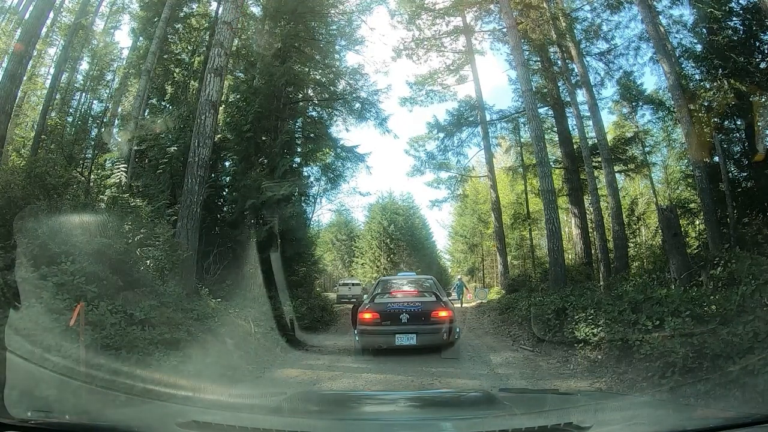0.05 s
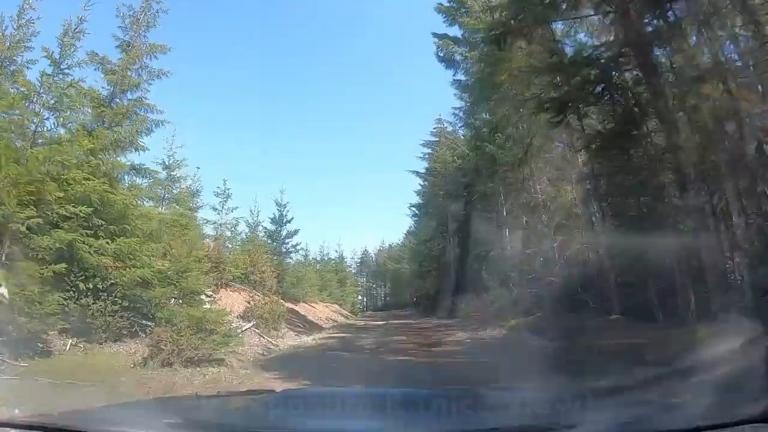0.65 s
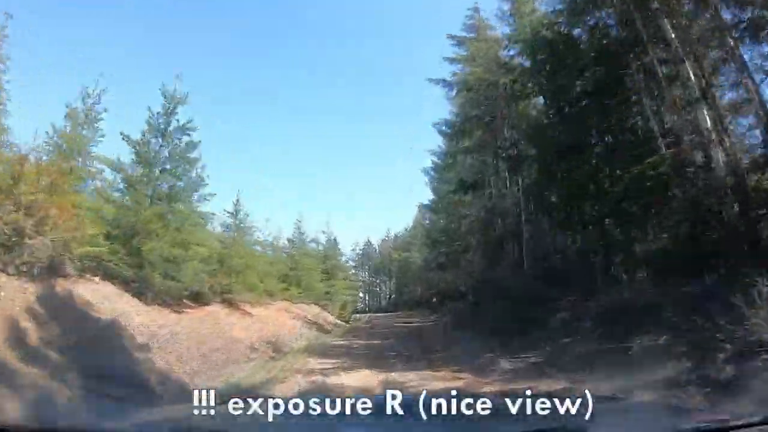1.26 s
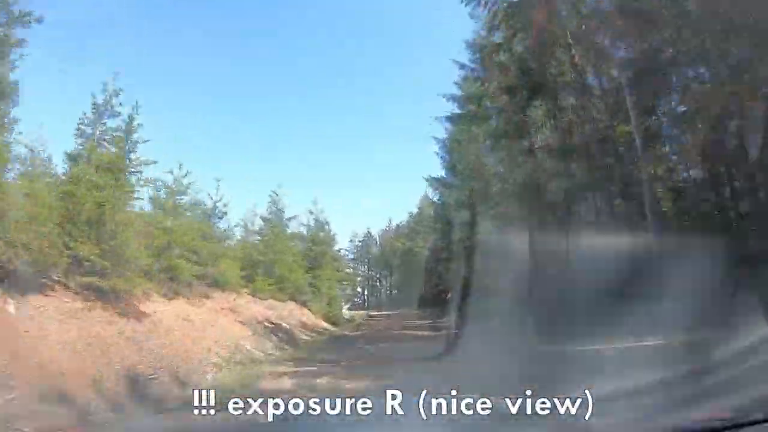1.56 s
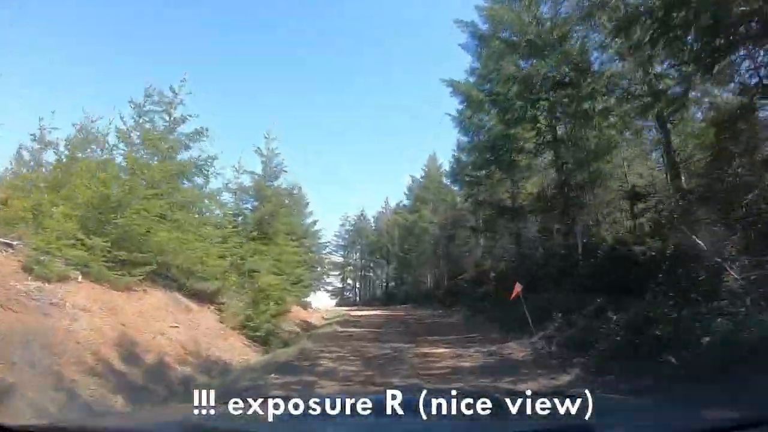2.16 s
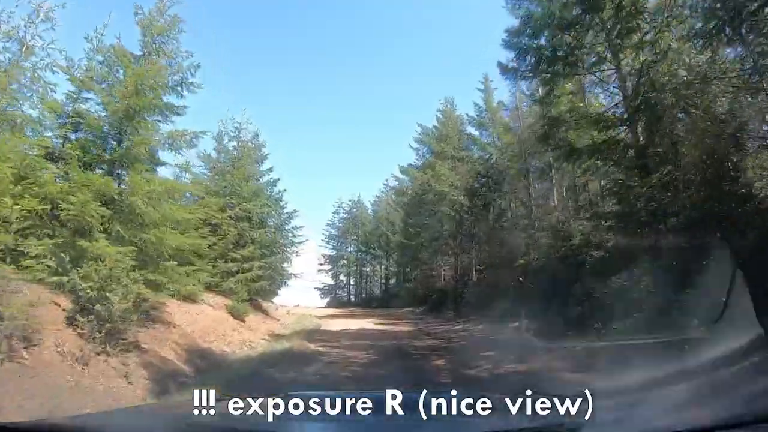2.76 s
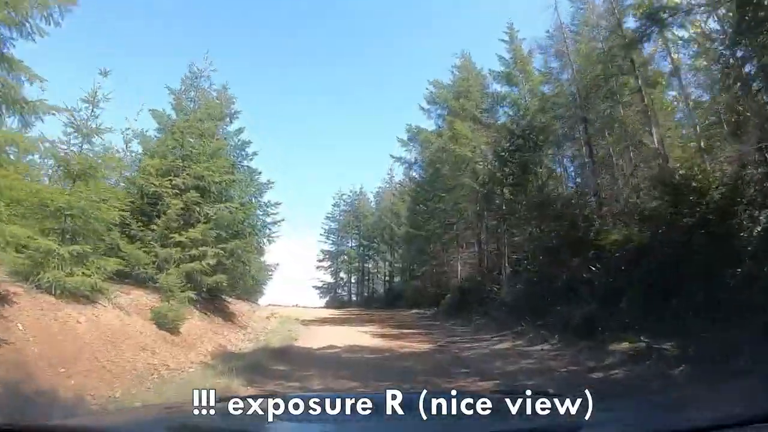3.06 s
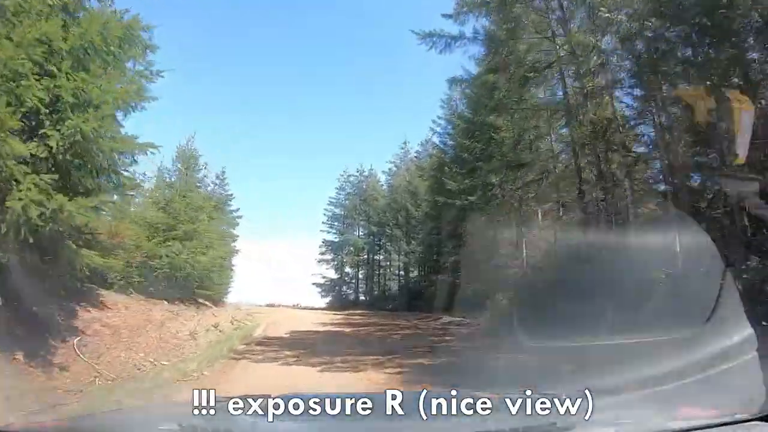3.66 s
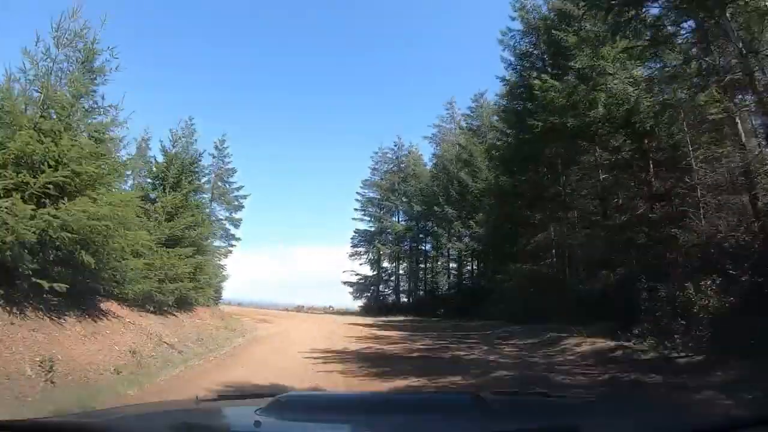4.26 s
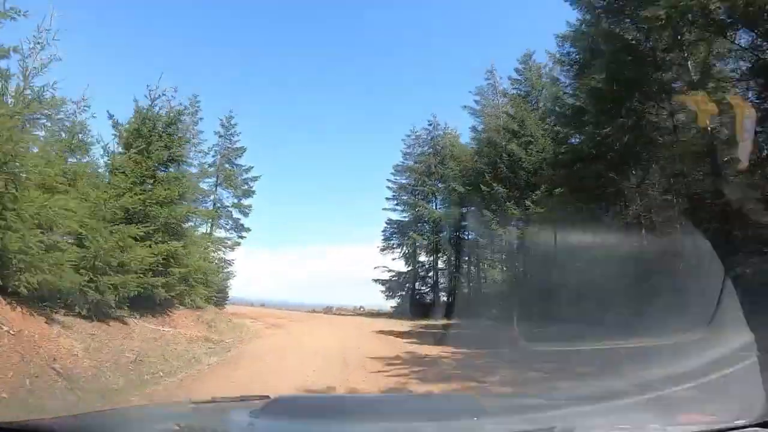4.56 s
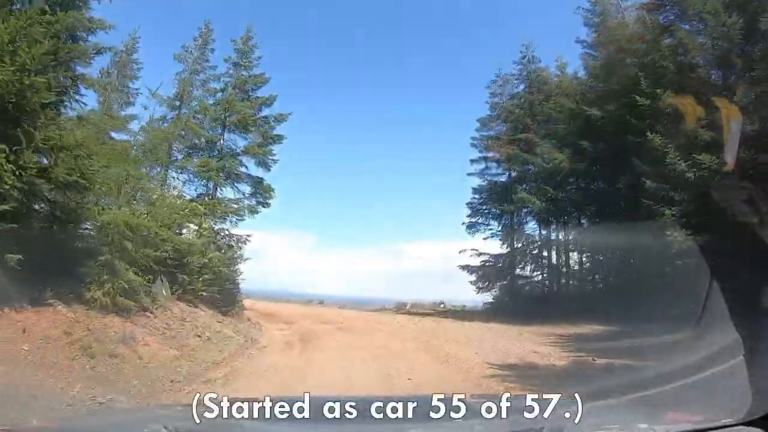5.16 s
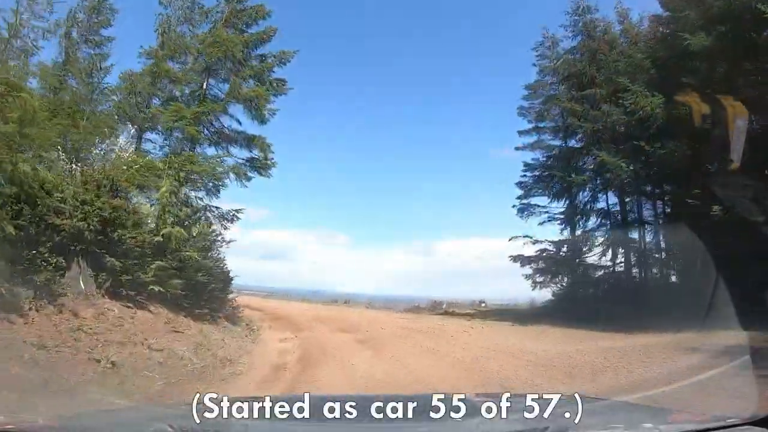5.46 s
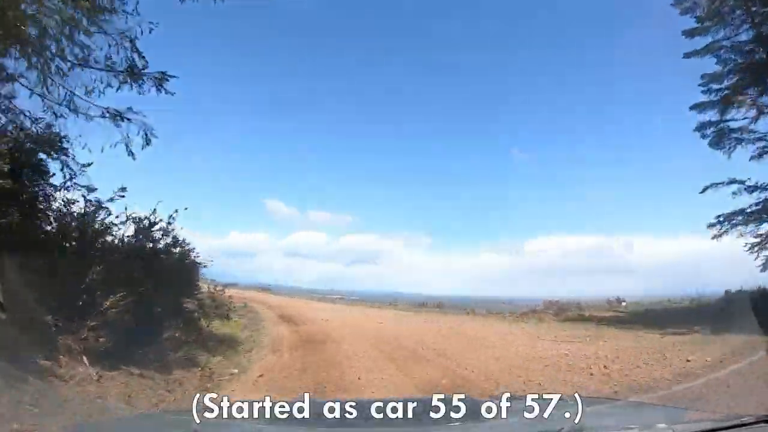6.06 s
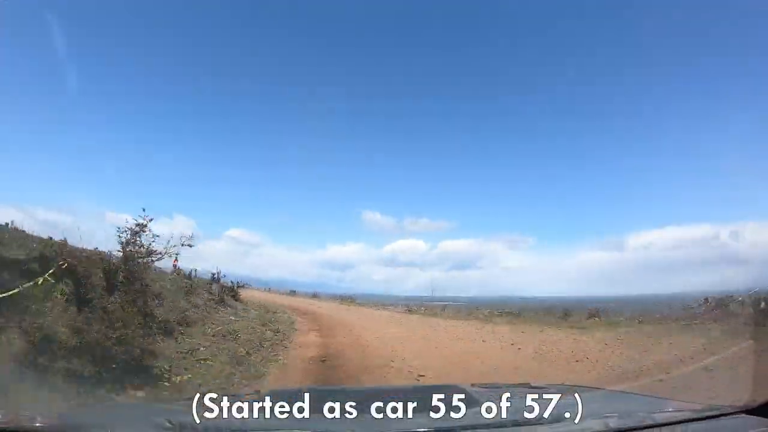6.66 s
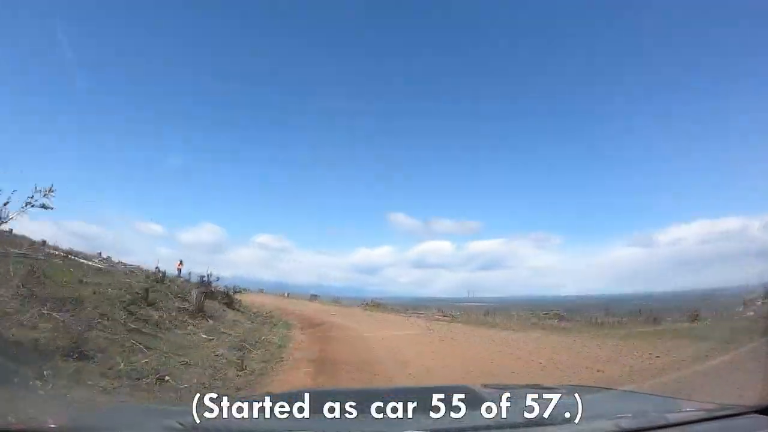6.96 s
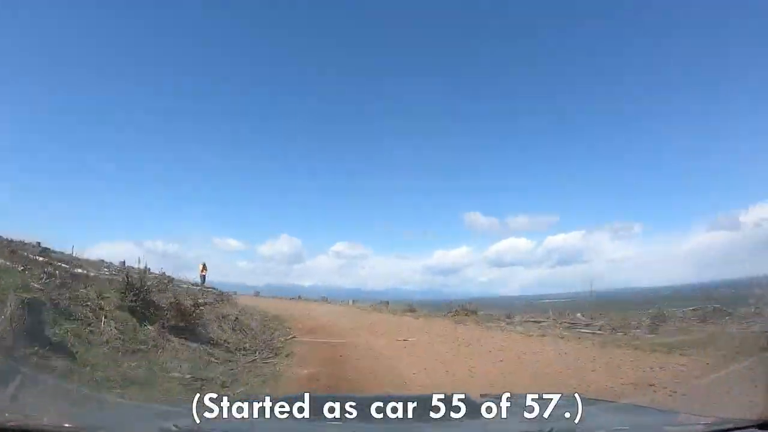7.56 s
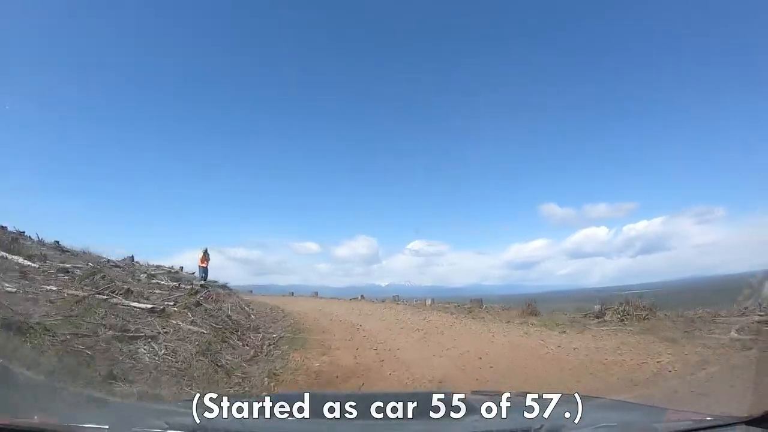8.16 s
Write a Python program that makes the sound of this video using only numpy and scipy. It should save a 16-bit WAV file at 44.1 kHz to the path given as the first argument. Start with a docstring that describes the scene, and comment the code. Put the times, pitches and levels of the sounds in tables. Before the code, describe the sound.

A lumpy four-cylinder idle is heard briefly inside a standing rally car. With a small tick it cuts to the car running hard on a gravel road. The engine booms and rasps, easing off and then pulling again, while the tyres rumble and something loose knocks over the ruts. Gravel and stones strike the floor and wheel arches, most thickly in the last few seconds. The microphone is close, in the bare cabin.

```python
"""A lumpy four-cylinder idle, heard from inside a rally car waiting in a queue. Then all at once
the car is running hard along a gravel forest road. At a close stereo microphone in the bare cabin
the engine booms and rasps on the throttle while the tyres rumble below. They fling gravel and
stones against the floor pan and wheel arches, most thickly in a long bend."""
import sys
import numpy as np
from scipy import signal
from scipy.fft import rfft, irfft
from scipy.io import wavfile
from scipy.ndimage import uniform_filter1d

SR = 44100
rng = np.random.default_rng(int(sys.argv[2]) if len(sys.argv) > 2 else 0)


def pcm_store(signal):
    """Save signal as 16-bit PCM."""
    levels = np.round(np.clip(np.atleast_2d(signal), -1, 1) * 32767)
    wavfile.write(sys.argv[1], SR, levels.astype(np.int16).T)


N = 366471
TIME = np.arange(N) / SR


def from_db(db):
    return 10 ** (np.asarray(db) / 20)


def rms_one(x):
    return x / np.sqrt(np.mean(x ** 2) + 1e-20)


def curve(rows):
    """A curve of time_s, value at every sample."""
    return np.interp(TIME, *np.transpose(rows))


def add(out, start_s, sound):
    """Mix a sound in at a given time."""
    i = int(np.clip(start_s * SR, 0, N - 1))
    out[:, i:i + sound.shape[1]] += sound[:, :N - i]


def colour(x, spectrum):
    """Shape a sound by rows of freq_hz, level_db, falling 24 dB an octave past their ends."""
    hz, db = np.transpose(spectrum)
    octave = np.log2(np.fft.rfftfreq(x.shape[-1], 1 / SR) + 1)
    outside = np.maximum(np.log2(hz[0]) - octave, 0) + np.maximum(octave - np.log2(hz[-1]), 0)
    gain_db = np.interp(octave, np.log2(hz), db) - 24 * outside
    return irfft(rfft(x) * from_db(gain_db), x.shape[-1])


# Stereo width, side against mid: freq_hz, side_db
STEREO_WIDTH = [(40, -58.5), (120, -71.5), (500, -69.5), (2000, -30.5), (4500, -19), (9000, -15),
                (13000, 0)]
def noise(spectrum):
    """Stereo noise, centred in the bass and middle, wider in the treble."""
    mid, side = colour(rng.standard_normal((2, N)), spectrum)
    side = colour(side, STEREO_WIDTH)
    return rms_one(np.array([mid + side, mid - side]))


def drift(rate_hz):
    """A smooth random wander of spread 1."""
    step, settle = 40, 2000
    pole = np.exp(-2 * np.pi * rate_hz * step / SR)
    white = rng.standard_normal(N // step + settle + 2)
    slow = signal.lfilter([1], [1, -2 * pole, pole ** 2], white)[settle:]
    return np.interp(np.arange(N) / step, np.arange(len(slow)), rms_one(slow))


def resonate(x, hz, width_hz):
    """A resonance with gain 1 at its peak."""
    r = np.exp(-np.pi * width_hz / SR)
    feedback = [1, -2 * r * np.cos(2 * np.pi * hz / SR), r * r]
    return signal.lfilter(np.array([1, 0, -1]) * (1 - r * r) / 2, feedback, x)


def with_modes(x, modes):
    """A sound with some resonances standing out of it."""
    return rms_one(x + sum(from_db(db) * resonate(x, hz, width) for hz, width, db in modes))


def snippet(ringing):
    """A random third of a second of a dense ringing."""
    start = rng.integers(N - SR // 3)
    return ringing[:, start:start + SR // 3]


def blow(ringing, rise_s, t60_s, tail_db, tail_t60_s):
    """One blow: a quick rise, a fast decay and the cabin's weaker tail."""
    t = TIME[:ringing.shape[1]]
    decay = from_db(-60 * t / t60_s) + from_db(tail_db - 60 * t / tail_t60_s)
    return rms_one(ringing) * (1 - np.exp(-t / rise_s)) * decay


def patter(per_s, size_db, t60_s):
    """The loudness contour of random grains of all sizes, each dying away."""
    sizes = from_db(size_db * np.minimum(rng.exponential(1, N), 3.5))
    grains = (rng.random(N) < per_s / SR) * sizes ** 2
    energy = signal.lfilter([1], [1, -from_db(-120 / (t60_s * SR))], grains + 1e-12)
    return rms_one(uniform_filter1d(np.sqrt(energy), size=60))


# The road, rutted at first, smooth on the straight, rough in the bend: time_s, roughness_db
ROAD_ROUGHNESS = [(.69, -1), (.98, 1), (1.12, 2.5), (1.7, 2), (2.05, -2.5), (2.5, -1.5), (3.1, -1.5),
                  (4.5, -1.5), (5.45, -0.5), (5.8, 0), (6.45, 4.5), (6.78, -1), (7.55, 3.5), (7.78, 4),
                  (8.1, 5.5)]
# The body shell shaking around the microphone: freq_hz, level_db
SHAKE_SPECTRUM = [(15, -10.5), (28, -3), (42, 2.5), (52, -3.5), (62, 4), (80, -7.5), (120, -3), (170, -9),
                  (260, -41.5)]
# The tyres, heard through the floor: freq_hz, level_db
ROAR_SPECTRUM = [(80, 1), (130, 2.5), (160, 6.5), (185, -3.5), (215, 1.5), (250, -1), (400, -6),
                 (550, -9.5), (700, -17), (950, -24), (1300, -34.5), (2200, -43.5), (4000, -58),
                 (8000, -67.5)]
# Resonances of the bare cabin: freq_hz, width_hz, boost_db
CABIN_MODES = [(100.7, 19, -7.5), (206.6, 4.9, 6.5), (285, 6, 0.5), (344, 23.6, 1.5), (415.3, 9.5, 1.5),
               (520, 39, -21.5), (955, 77, -1.5)]
def road(rough_db):
    """Ruts shake the body shell; the tread roars over the gravel and rings the cabin."""
    shake = from_db(-18 + .81 * rough_db + .26 * drift(16)) * noise(SHAKE_SPECTRUM)
    roar = from_db(-20 + rough_db + drift(16)) * with_modes(noise(ROAR_SPECTRUM), CABIN_MODES)
    return shake + roar


# The floor pan under gravel: freq_hz, level_db
PAN_SPECTRUM = [(300, 14.5), (700, 14), (1300, 6), (2100, 5), (2900, -0.5), (4200, -3.5), (5200, -10.5),
                (6300, -18.5), (8000, -24.5)]
# Its resonances: freq_hz, width_hz, boost_db
PAN_MODES = [(916, 64, -3.5), (1537, 15, -13.5), (2160, 90, -14), (3370, 60, -6), (4220, 80, -8),
             (4630, 72, -4.5), (5100, 61, -7)]
# Sharp grit in the wheel arches: freq_hz, level_db
GRIT_SPECTRUM = [(3000, -7.5), (5000, 16), (6700, 2), (8000, 6.5), (10500, 0), (13000, 1), (15500, -20)]
# Resonances of the thin arch liners: freq_hz, width_hz, boost_db
ARCH_MODES = [(4500, 150, -1), (5140, 71, -1.5), (7960, 130, -4.5), (8800, 110, -7), (10200, 78, -1)]
def underbody():
    """The steady ringing of the floor pan, and of the arch liners under grit."""
    return with_modes(noise(PAN_SPECTRUM), PAN_MODES), with_modes(noise(GRIT_SPECTRUM), ARCH_MODES)


# Gravel thrown up by the tyres: time_s, level_db
SPRAY_LEVEL = [(.69, -39.5), (1.0, -41), (1.15, -53), (1.45, -42.5), (2.25, -42.5), (2.42, -53.5),
               (3.15, -52.5), (3.6, -62.5), (4.25, -44.5), (5.25, -39), (5.48, -41), (5.85, -34.5),
               (6.3, -31), (6.52, -31.5), (6.75, -33.5), (7.1, -38), (7.35, -28.5), (7.6, -35.5),
               (8.06, -31.5), (8.31, -36.5)]
def spray(spray_db, ringing, grit):
    """Gravel peppers the arches: pebbles clatter, chips tick, and a few lumps clunk dully."""
    pebbles = patter(per_s=79, size_db=-3.5, t60_s=.2) * (from_db(-6) * ringing + from_db(-21.5) * grit)
    chips = from_db(-29) * patter(per_s=33, size_db=9.5, t60_s=.04) * grit
    clunks = from_db(4) * patter(per_s=32, size_db=2, t60_s=.45)
    lumps = clunks * noise([(450, 1.5), (700, 2), (1200, -6.5), (2000, -13)])
    return from_db(spray_db) * (pebbles + chips + lumps)


# Sheets of gravel in the bend: start_s, length_s, level_db
GRAVEL_SHEETS = [(5.991, 0.048, -28), (6.112, 0.11, -32), (6.28, 0.096, -28.5), (6.711, 0.093, -33),
                 (7.347, .08, -34.5)]
# Their small stones ring the pan's upper modes: freq_hz, gain_db
SHEET_COLOUR = [(500, 4), (1300, -2), (4500, 3.5), (9000, 0)]
def showers(ringing, grit, rise_s=.01, fall_s=.017):
    """A tyre digs in and throws a whole sheet of gravel: a dense rattle that holds and dies away."""
    swell = 0
    for start_s, length_s, level_db in GRAVEL_SHEETS:
        rise = np.clip((TIME - start_s) / rise_s, 0, 1)
        fall = np.exp(-np.maximum(TIME - start_s - length_s, 0) / fall_s)
        swell += from_db(level_db) * rise * fall
    grains = patter(per_s=900, size_db=2.5, t60_s=.04)
    return swell * grains * (colour(ringing, SHEET_COLOUR) + from_db(-20) * grit)


# A loose part knocking in the car: start_s, level_db
LOOSE_KNOCKS = [(1.182, -32), (1.274, -37), (1.328, -20), (1.437, -18), (1.559, -34), (1.583, -23),
                (1.623, -20), (1.671, -18.5), (1.755, -36), (2.017, -28), (2.751, -25), (2.783, -24.5),
                (4.084, -33), (7.914, -15.5)]
# Its tone against the floor pan's: freq_hz, gain_db
LOOSE_COLOUR = [(500, 8), (900, 9), (2300, -2.5), (3500, -8), (8000, -1.5)]
def loose_part(ringing):
    """Over the ruts something loose in the body knocks, short and dry."""
    out, clack = np.zeros((2, N)), colour(ringing, LOOSE_COLOUR)
    for start_s, level_db in LOOSE_KNOCKS:
        knock = blow(snippet(clack), rise_s=.00092, t60_s=.032, tail_db=-15, tail_t60_s=.26)
        add(out, start_s, from_db(level_db) * knock)
    return out


# Stones out in the wheel arches: start_s, level_db, pitch_hz
LINER_PINGS = [(1.806, -39.5, 4310), (4.468, -43, 5200), (5.286, -35, 5255), (5.551, -43, 5207),
               (6.93, -36, 5153), (7.396, -33.5, 5250)]
def pings(cracking, width_hz=650):
    """A stone that catches a thin wheel-arch liner leaves a short, rough ping."""
    out = np.zeros((2, N))
    for start_s, level_db, hz in LINER_PINGS:
        liner = resonate(resonate(snippet(cracking), hz, width_hz), hz, width_hz)
        ping = blow(liner, rise_s=.0037, t60_s=.11, tail_db=-19, tail_t60_s=.18)
        add(out, start_s, from_db(level_db) * ping)
    return out


# One stone's clack, heard from above the pan: freq_hz, level_db
CLACK_SPECTRUM = [(400, 12.5), (1300, 8.5), (2100, 7.5), (2900, 2.5), (4200, -1), (5300, -5.5),
                  (6300, -16.5), (8000, -20.5)]
# The crack of its contact: freq_hz, level_db
CRACK_SPECTRUM = [(3000, -3.5), (5000, 15), (6700, 5), (8200, 6), (10500, -1), (13000, -1), (15500, -16)]
def stone_textures():
    """The grainy sounds of stone on the car: clacking on the pan, cracking in the arches."""
    clacking = with_modes(noise(CLACK_SPECTRUM), PAN_MODES) * patter(700, size_db=2.2, t60_s=.035)
    cracking = with_modes(noise(CRACK_SPECTRUM), ARCH_MODES) * patter(1500, size_db=3, t60_s=.012)
    return clacking, cracking


def struck_spot(texture, spread_db=3.2):
    """Each spot that is struck favours some bands and weakens others."""
    ring = snippet(texture)
    bands_hz = 300 * 2 ** (np.arange(30) / 5)
    gains_db = spread_db * np.clip(rng.standard_normal(len(bands_hz)), -1.7, 1.7)
    return colour(ring, np.transpose([bands_hz, gains_db]))


def small_stones(spray_db, per_s=12, thick_spray_db=-35):
    """Random hits, oftener, harder and sharper in thick spray: start_s, level_db, sharpness_db."""
    thick_db = spray_db - thick_spray_db
    chance, (size, edge) = rng.random(N), rng.standard_normal((2, N))
    level_db = -47 + .4 * thick_db - 4 * size
    sharp_db = -16 + .5 * thick_db - 3 * edge
    hits = chance < per_s * from_db(.1 * thick_db) / SR
    return list(zip(TIME[hits], level_db[hits], sharp_db[hits]))


# Hard stones on the floor pan, close under the microphone: start_s, level_db, sharpness_db
HARD_STONES = [(.94, -45, -13), (1.067, -37.5, -33), (1.464, -38.5, -21), (1.515, -48, -26),
               (1.743, -52, -21), (1.787, -44.5, -11), (1.805, -47.5, -11), (1.865, -49, -14),
               (1.898, -41, -19), (1.955, -37.5, -10.5), (1.966, -48.5, -13), (2.046, -58, -12),
               (2.14, -47.5, -17), (2.231, -47.5, -14), (2.278, -61, -3), (2.41, -54, -19),
               (2.475, -59, -7), (2.941, -47, -14), (3.155, -59, -7), (3.24, -49, -19), (3.33, -64, -5),
               (3.46, -51, -25), (3.66, -50.5, -14), (4.157, -51, -9), (4.287, -43.5, -15),
               (4.408, -42, -14), (4.459, -42, -13), (4.555, -43, -9.5), (4.618, -49, -11),
               (4.638, -48, -19), (4.688, -59, -13), (4.764, -40.5, -34), (4.808, -47.5, -9),
               (4.865, -47.5, -16), (5.061, -31, -14), (5.159, -41.5, -8), (5.203, -48.5, -5.5),
               (5.285, -40, -18), (5.337, -43.5, -11.5), (5.437, -40.5, -32), (5.511, -41.5, -15),
               (5.552, -48, -13), (5.607, -39, -31), (5.689, -49, -2), (5.72, -40.5, -23),
               (5.802, -38, -35), (5.876, -44.5, -12), (5.91, -49, -10), (5.94, -40, -9),
               (5.97, -36.5, -16), (5.999, -33.5, -27), (6.032, -36, -20), (6.103, -30.5, -15),
               (6.122, -30.5, -25), (6.22, -27.5, -16.5), (6.283, -34, -19), (6.32, -43, -14),
               (6.368, -28.5, -36), (6.503, -46, -22), (6.597, -54, -12), (6.664, -30, -17),
               (6.728, -34, -18), (6.765, -46, -2), (6.799, -34.5, -17), (6.879, -42, -10),
               (6.93, -36, -18), (7.026, -35.5, -18), (7.08, -41.5, -31), (7.149, -41, -13),
               (7.223, -41, -15), (7.263, -31, -24), (7.289, -33, -16), (7.395, -33.5, -19),
               (7.425, -50, -15), (7.49, -48, -7), (7.604, -44, -20), (7.687, -56, -12), (7.734, -46, -10),
               (7.752, -40, -14.5), (7.793, -44.5, -6), (7.89, -43.5, -14), (7.929, -39, -18),
               (7.991, -34.5, -22), (8.077, -28, -25), (8.113, -39, -20), (8.195, -41.5, -16),
               (8.229, -36, -21)]
def stones(hits, clacking, cracking, t60_s):
    """Each stone clacks on the pan; a sharp contact adds a dry, broad crack that dies first."""
    out, tail_t60_s = np.zeros((2, N)), 1.84 * t60_s
    for start_s, level_db, sharp_db in hits:
        pan, contact = struck_spot(clacking), struck_spot(cracking)
        clack = blow(pan, rise_s=.0039, t60_s=t60_s, tail_db=-14, tail_t60_s=tail_t60_s)
        crack = blow(contact, rise_s=.0029, t60_s=.8 * t60_s, tail_db=-11.5, tail_t60_s=tail_t60_s)
        add(out, start_s - .0015, from_db(level_db + 11) * (clack + from_db(sharp_db) * crack))
    return out


# Big stones on the chassis below: start_s, level_db, pitch_hz, clang_db, ring_t60_s
BIG_STONES = [(1.672, -27, 766, 7, .2), (1.905, -17, 728, -2, .2), (4.804, -10.5, 834, -5, 0.14),
              (4.835, -22, 690, 7, .25), (5.028, -22, 580, -13, 0.18), (5.473, -19, 1134, 9, 0.22),
              (5.65, -22, 949, 3, 0.17), (5.802, -11, 904, -1, 0.23), (5.808, -21.5, 1480, 5.5, 0.22),
              (6.155, -11, 914, -10, 0.23), (6.213, -24, 1057, 7, .26), (6.281, -28, 668.6, -6, .2),
              (6.373, -13, 938, -7, .2), (6.787, -25, 882, 4, .2), (6.945, -18.5, 2280, 0, .14),
              (7.269, -11.5, 592.7, -7, .2), (7.295, -21.5, 716, 12, 0.28), (7.559, -15, 823, -11, 0.17),
              (7.672, -21, 1051, 0, .15), (7.997, -14.5, 850, -6, .2), (8.078, -12.5, 670, 5.5, .24)]
# Modes of a struck chassis part: pitch_ratio, level_db, ring_share
CHASSIS_MODES = [(1, 2, 0.93), (1.04, -1, .6), (1.22, -12, .55), (1.38, -12.5, 0.5), (1.509, -23, 0.65),
                 (1.668, -16, .45), (1.949, -16, .35), (2.53, -23, .3)]
def big_stones(ringing, clang_rise_s=.00087):
    """Big stones thud on the chassis and set the struck part clanging at its own pitch."""
    out, t = np.zeros((2, N)), TIME[:SR // 3]
    for start_s, level_db, hz, clang_db, ring_s in BIG_STONES:
        width_hz = .93 * hz
        body = resonate(resonate(snippet(ringing), hz, width_hz), hz, width_hz)
        thud = blow(body, rise_s=.0035, t60_s=.2, tail_db=-2.5, tail_t60_s=.26)
        clang = 0
        for ratio, mode_db, share in CHASSIS_MODES:
            decay = from_db(mode_db - 60 * t / (share * ring_s))
            clang += decay * np.sin(2 * np.pi * (ratio * hz * t + rng.random()))
        clang *= from_db(clang_db + 1) * (1 - np.exp(-t / clang_rise_s))
        add(out, start_s, from_db(level_db - 11) * (thud + clang))
    return out


def tick(start_s, level_db, t60_s):
    """One dry tick, dead centre."""
    out, t = np.zeros((2, N)), TIME[:SR // 100]
    click = signal.lfilter([1], [1, -.85], from_db(level_db - 60 * t / t60_s))
    add(out, start_s, np.array([click, click]))
    return out


# The idle's drone in the standing car: firing_multiple, level_db
IDLE_TONES = [(1, -20.5), (2, -19), (3, -28.5), (4, -31.5), (6.5, -36), (10, -41.5)]
# Its clatter, heard from the cabin: freq_hz, level_db
CLATTER_SPECTRUM = [(88, -29), (150, 1.5), (237, 0), (320, 4), (451, -10), (577, -4.5), (672, -18.5),
                    (797, -9), (964, -24), (1300, -23.5), (1550, -32.5), (1900, -31.5), (3130, -36.5),
                    (5630, -46.5), (7500, -46), (10000, -57), (14000, -73)]
def idle(firing_hz=31.65, knock_t60_s=.045, weak_loss_db=10):
    """A lumpy idle: uneven firings drone, shake the shell and clatter, every other one harder."""
    firings = (TIME - .1835) * firing_hz
    throb = from_db(-2.5 + 3 * drift(2.8))
    drone = 0
    for multiple, level_db in IDLE_TONES:
        amplitude = np.sqrt(2) * from_db(level_db + 2 * drift(13))
        cycles = multiple * firings + rng.random() + .012 * multiple * drift(4.3)
        drone += amplitude * np.sin(2 * np.pi * cycles)
    shudder = from_db(-28.5) * noise([(45, -22), (68, 5), (85, 5), (125, -2)])
    since_firing_s = firings % 1 / firing_hz
    knock_db = -60 * since_firing_s / knock_t60_s - weak_loss_db * (np.floor(firings) % 2)
    beat = uniform_filter1d(from_db(knock_db), size=100)
    clatter = from_db(-32.5) * noise(CLATTER_SPECTRUM)
    # the clatter's body swells at each firing and sinks between; the hiss above stays even
    knocking = resonate(clatter, hz=720, width_hz=700) * (3.4 * beat - .25)
    return (drone + shudder) * throb + clatter + knocking


# The intake, heard from the cabin: freq_hz, level_db
RASP_SPECTRUM = [(500, -8), (800, 7.5), (950, 8.5), (1200, 2), (1700, -0.5), (2100, -5.5), (3000, -14.5),
                 (5000, -19.5), (6500, -30.5), (9000, -34), (14000, -41.5)]
def intake_rasp(firings, pulse_depth_db=7):
    """A rasp that swells at each firing; a rattle recurring every four packs it with close lines."""
    rattle = np.interp(firings / 4 % 1, np.linspace(0, 1, 1024), rng.standard_normal(1024))
    rasp = rms_one(colour(rattle, RASP_SPECTRUM)) + .5 * noise(RASP_SPECTRUM)
    pulse = uniform_filter1d(from_db(-pulse_depth_db * (firings % 1)), size=100)
    return with_modes(rasp, PAN_MODES) * rms_one(pulse)


# Exhaust tones under full load: firing_multiple, level_db
EXHAUST_TONES = [(1.25, -8), (1.5, -18), (1.75, -20.5), (2, -7), (2.25, -20), (2.5, -19.5), (2.75, -14.5),
                 (3, -10), (3.25, -12), (3.502, -29), (3.75, -12.5), (4, -13.5), (4.25, -16), (4.5, -24),
                 (4.75, -28), (5, -27.5), (5.5, -20), (6, -21.5), (6.248, -24.5), (6.75, -22.5), (7, -26.5),
                 (7.25, -24), (8, -27.5)]
def exhaust(firings):
    """Overtones ring the cabin; the higher they are, the more uneven firing roughens them."""
    tones = 0
    for multiple, level_db in EXHAUST_TONES:
        jitter = .0015 * multiple ** 2 * drift(25)
        amplitude = from_db(level_db + 2 * drift(2.74))
        tones += amplitude * np.sin(2 * np.pi * (multiple * firings + rng.random() + jitter))
    return with_modes(tones, CABIN_MODES)


# Engine speed along the forest road: time_s, firing_hz
FIRING_RATE = [(.7, 138.7), (1.12, 138.4), (1.3, 132.3), (1.6, 127), (1.85, 118), (2.05, 111.5),
               (2.35, 105.4), (2.72, 101.8), (3.0, 114.8), (3.12, 112.8), (3.3, 127.3), (3.5, 131.1),
               (3.72, 127), (3.9, 131.4), (4.07, 128), (4.25, 130.7), (4.52, 135.1), (4.72, 132.2),
               (4.84, 125.6), (5.0, 128.9), (5.83, 133.5), (6.3, 126.6), (6.86, 132.8), (7.55, 146.4),
               (8.3, 134.9)]
# The driver's foot: time_s, load_db
ENGINE_LOAD = [(.69, 1.5), (1.03, 3), (1.15, -7.5), (1.6, -5.5), (2.1, -13.5), (2.45, -7), (2.7, -9.5),
               (2.8, -12.5), (2.88, 3.5), (2.97, -0.5), (3.04, -15), (3.3, -3.5), (3.78, -9), (3.86, 1),
               (4.62, 0), (4.8, -13.5), (4.97, 1.5), (5.7, -1), (6.1, -5), (7.3, -1.5), (8.31, -2)]
# The uneven cylinders' low lope: time_s, level_db
LOPE_LEVEL = [(.7, -19), (1.05, -22.5), (1.28, -16), (1.8, -27), (2.05, -42), (3.1, -29), (3.4, -17),
              (3.7, -22), (3.9, -28.5), (5.5, -24), (6.5, -27), (8.31, -30)]
# The boom dips briefly, mostly as the foot lifts: centre_s, depth_db
BOOM_DIPS = [(1.001, 4.1), (2.759, 11), (3.06, 13), (4.802, 5.3), (7.74, 7.1), (7.93, 7)]
def engine(rough_db, dip_s=.044, waver_db=1.5):
    """Firings boom around the microphone; load brings out the exhaust overtones and intake rasp."""
    firing_hz, load_db = curve(FIRING_RATE), curve(ENGINE_LOAD)
    # the revs waver more as the wheels slip on rough ground
    wobble = .002263 * from_db(rough_db) * drift(20.4)
    firings = np.cumsum(firing_hz * (1 + wobble)) / SR
    # the cabin booms most when the engine labours low; boom and overtones sink on rough ground
    boom_db = -11.5 - 17.5 * np.log2(firing_hz / 101.6) + .27 * load_db - .89 * rough_db
    boom_db -= sum(db * np.exp(-((TIME - centre_s) / dip_s) ** 2) for centre_s, db in BOOM_DIPS)
    boom = from_db(boom_db + waver_db * drift(7.9)) * np.sin(2 * np.pi * firings)
    lope = from_db(curve(LOPE_LEVEL) + waver_db * drift(6)) * np.sin(2 * np.pi * firings * 3 / 4)
    overtones = from_db(-19.5 - .32 * rough_db) * exhaust(firings)
    rasp = from_db(-36.5) * intake_rasp(firings)
    return np.sqrt(2) * (boom + lope) + from_db(load_db) * (overtones + rasp)


def scene():
    """With a tick, the idle gives way at once to engine, road and gravel at speed."""
    rough_db, spray_db = curve(ROAD_ROUGHNESS), curve(SPRAY_LEVEL)
    standing = idle()
    driving = engine(rough_db) + road(rough_db)
    ringing, grit = underbody()
    driving += spray(spray_db, ringing, grit) + showers(ringing, grit)
    driving += big_stones(ringing) + loose_part(ringing)
    clacking, cracking = stone_textures()
    driving += stones(HARD_STONES, clacking, cracking, t60_s=.15)
    driving += stones(small_stones(spray_db), clacking, cracking, t60_s=.048)
    driving += pings(cracking)
    jump_s, crossfade_s = .688, .013
    moving = np.clip((TIME - jump_s) / crossfade_s + .5, 0, 1)
    return (1 - moving) * standing + tick(start_s=.675, level_db=-17, t60_s=.000099) + moving * driving


def limiter(x, ceiling_db, release_db_per_s):
    """The gain ducks whenever the short-term level passes the ceiling, and then recovers."""
    power = uniform_filter1d(np.mean(x ** 2, axis=0), size=400)
    over_db = np.maximum(10 * np.log10(np.abs(power) + 1e-12) - ceiling_db, 0)
    release_db = release_db_per_s * TIME
    duck_db = np.maximum.accumulate(over_db + release_db) - release_db
    return x * from_db(-uniform_filter1d(duck_db, size=200))


def record(dry):
    """The camera in the cabin holds the level down, rounds the tallest peaks and cuts the top."""
    peak, cutoff_hz = .85, 15700
    limited = limiter(dry * from_db(1), ceiling_db=-10.5, release_db_per_s=103.5)
    rounded = limited / (1 + (limited / peak) ** 8) ** (1 / 8)
    return signal.sosfilt(signal.ellip(10, .1, 80, cutoff_hz, fs=SR, output="sos"), rounded)


dry = scene()
out = record(dry)
pcm_store(out)
```